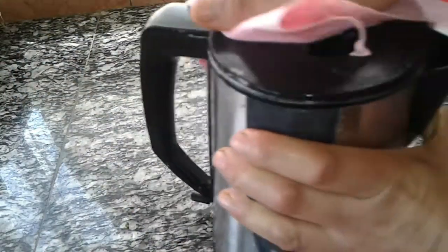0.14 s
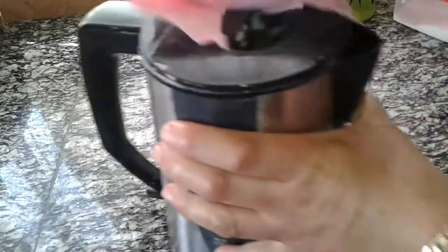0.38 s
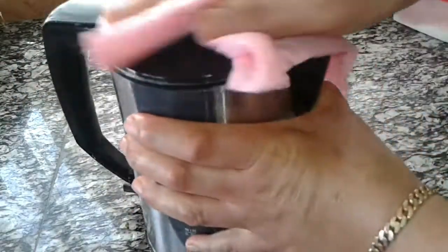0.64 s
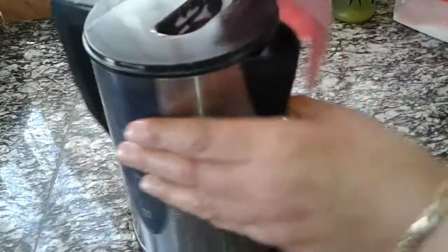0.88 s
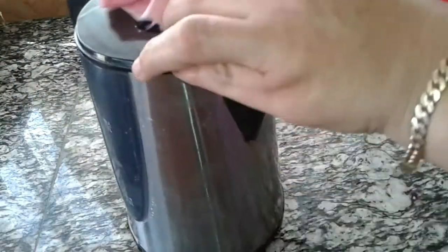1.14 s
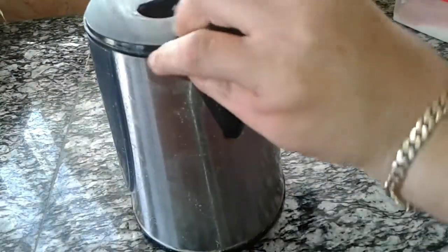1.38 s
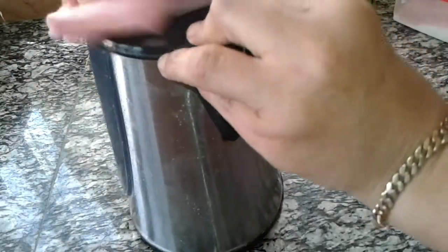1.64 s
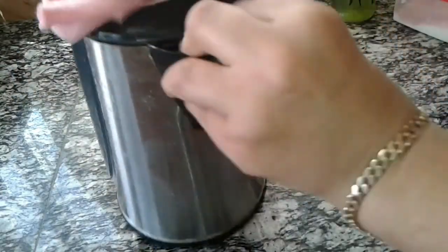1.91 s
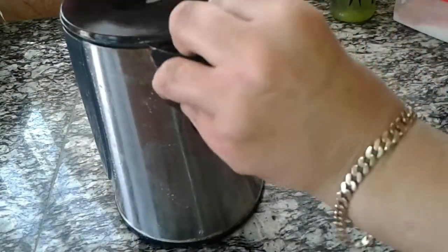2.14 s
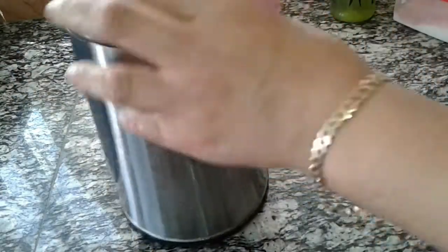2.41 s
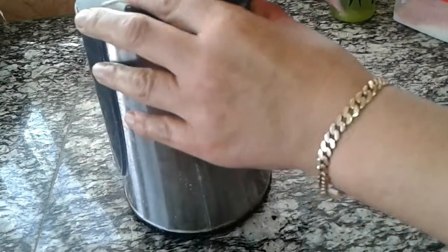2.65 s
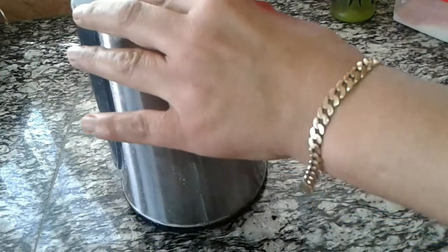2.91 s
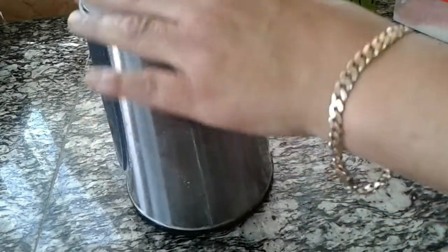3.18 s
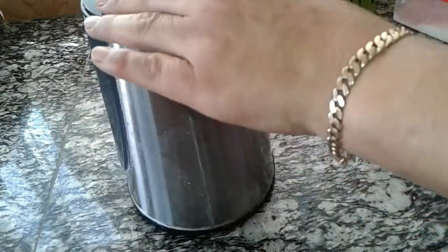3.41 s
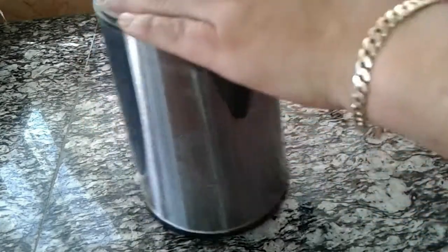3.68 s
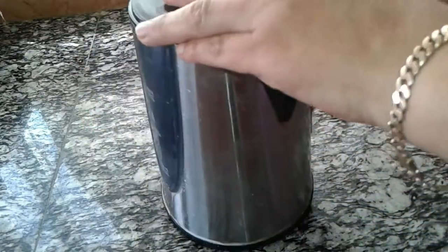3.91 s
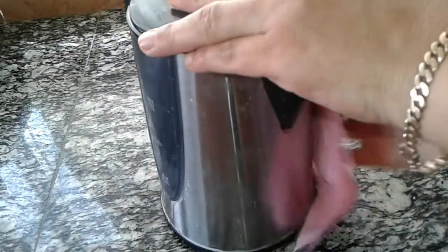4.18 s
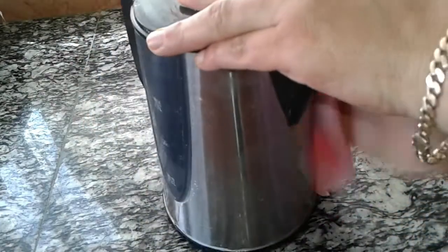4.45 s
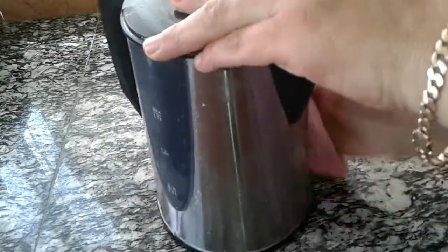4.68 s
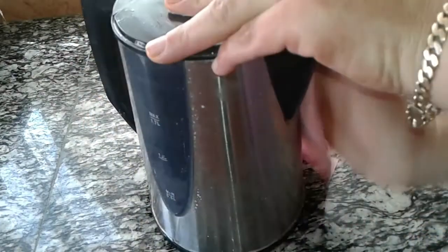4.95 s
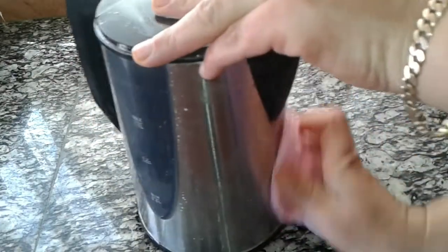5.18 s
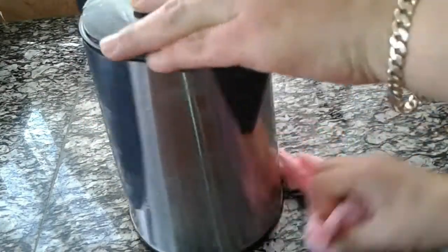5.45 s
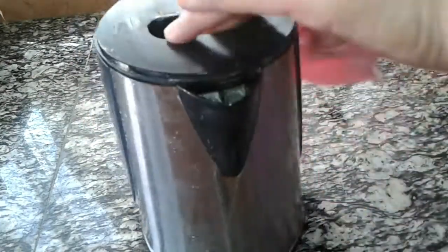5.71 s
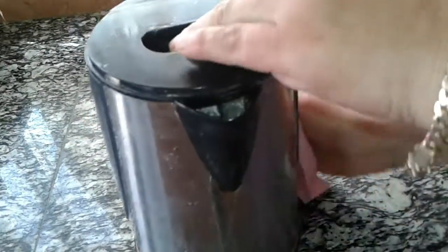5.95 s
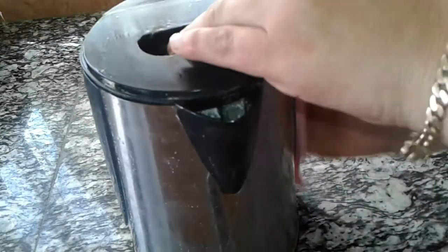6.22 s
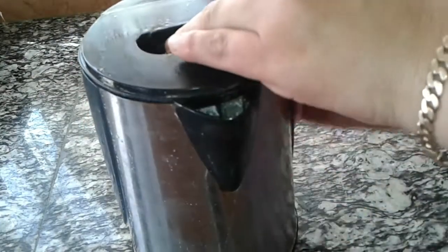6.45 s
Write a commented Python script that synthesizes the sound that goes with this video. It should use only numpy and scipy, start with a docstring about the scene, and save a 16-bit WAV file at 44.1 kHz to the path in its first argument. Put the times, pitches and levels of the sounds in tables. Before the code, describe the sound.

Close up in a quiet kitchen, a cloth wipes a steel kettle in quick, uneven strokes of airy, fibrous hiss with a slightly hollow body. The kettle shifts and knocks dully on stone, strongest in the first two and a half seconds, with crisp ticks on lid and rim and tiny thin squeaks. The middle goes soft and sparse, then steadier rubbing returns. The sound is mono with short room reflections.

```python
"""A kitchen with a stone counter: a cloth wipes a steel kettle in short strokes, close to a mono microphone.
Friction is a dense train of random fibre slips, heard as hiss and through the lid and wall.
The pushed kettle rocks and knocks on the stone: force pulses excite its damped modes.
Cloth and fingers tick on lid and rim (filtered noise bursts), the wall sings faintly (one slow mode),
and thin chirps (gliding, wobbling sines) sound over a quiet room of shaped noise."""
import sys
import numpy as np
from scipy import signal
from scipy.fft import rfft, irfft
from scipy.io import wavfile
from scipy.ndimage import uniform_filter1d

SR = 44100
rng = np.random.default_rng(int(sys.argv[2]) if len(sys.argv) > 2 else 0)


def magnitude_from_level(level_db):
    """Linear magnitude for a level in decibels (20 dB per decade)."""
    exponent = np.asarray(level_db, float) / 20
    return 10 ** exponent


def to_wav(sig):
    """Store sig (one row per channel, or 1-D mono) as 16-bit WAV at the path in sys.argv[1].

    Samples outside -1..1 are clipped; the rate is SR.
    """
    pcm = np.clip(np.atleast_2d(sig), -1, 1) * 32767
    pcm = np.round(pcm).astype(np.int16)
    wavfile.write(sys.argv[1], SR, pcm.T)  # frames by channels


N = 290470  # samples

# Quiet room: relative spectrum [f/Hz, level per Hz/dB]
ROOM_SPECTRUM = [(15, 2), (25, 2), (35, -14), (49, -3), (91, 7), (198, 3), (305, 5), (349, 0.5), (598, -5),
                 (848, -3), (1750, -14), (2600, -12.5), (4040, -12.5), (8580, -16), (15500, -17)]
# Fibres over steel: relative spectrum [f/Hz, level per Hz/dB]
HISS_SPECTRUM = [(1470, -19), (2500, -8.5), (2910, -6), (3170, -4.5), (3830, -3.5), (4430, -5),
                 (7220, -0.5), (9660, -2.5), (15500, -15)]
# Lid and wall under the rub: relative spectrum [f/Hz, level per Hz/dB]
BODY_SPECTRUM = [(290, 8), (500, 2), (874, 2), (1390, 5), (1560, 3), (1680, 3.5), (2250, 3), (5000, -12),
                 (6500, -50), (11000, -120)]
# Strokes of the cloth [t/s at full speed, length/s between the ends of the hiss arch, hiss level/dB]
STROKES = [(0.074, 0.15, -55), (0.292, 0.38, -54.5), (0.511, 0.18, -47), (0.765, 0.36, -51),
           (0.901, 0.11, -54.5), (1.073, 0.68, -63), (1.372, 0.23, -57.5), (1.453, 0.13, -57),
           (1.69, 0.17, -64.5), (1.767, 0.11, -53.5), (1.905, 0.12, -51.5), (2.034, 0.15, -56),
           (2.176, 0.12, -51.5), (2.332, 0.11, -61), (2.51, 0.44, -65), (2.65, 0.28, -60.5),
           (2.939, 0.12, -67), (3.121, 0.092, -68.5), (3.3, 0.31, -71), (3.569, 0.28, -59),
           (3.867, 0.32, -58.5), (4.009, 0.14, -51), (4.093, 0.052, -52), (4.28, 0.39, -54.5),
           (4.394, 0.075, -53), (4.531, 0.15, -53), (4.606, 0.091, -52), (4.726, 0.14, -58),
           (4.913, 0.3, -55), (4.989, 0.28, -54), (5.29, 0.23, -58), (5.444, 0.17, -59.5),
           (5.57, 0.57, -65.5), (5.838, 0.03, -63), (5.945, 0.18, -52.5), (6.179, 0.2, -56.5),
           (6.308, 0.13, -52.5), (6.464, 0.12, -54.5), (6.56, 0.075, -55.5)]
# How much the wiped part resounds, more on the lid than on the wall [t/s, level against the hiss/dB]
HOLLOWNESS = [(0, -6.5), (.3, -2.5), (.6, -9), (1.2, -3), (1.8, -8), (2.1, -2.5), (2.6, -2.5), (3.2, -3.5),
              (3.6, -9.5), (4.1, -8), (5, -11.5), (5.45, -6), (6, -9), (6.59, -9.5)]
# Modes of kettle and counter together, before excitation and stretch [f/Hz, level/dB, t60/s]
KETTLE_MODES = [(106, -38, 0.48), (129.6, -13, 0.56), (153, -23, 0.78), (190, -6, 0.42),
                (221.3, -5.5, 0.16), (270.6, -7.5, 0.063), (295.4, -5, 0.077), (315.6, 2, 0.078),
                (372, -5, 0.095), (408, 2, 0.064), (475.5, -7, 0.083), (536.4, -9, 0.12), (605, -13, 0.18),
                (696, -4.5, 0.038), (784, -14, 0.099), (1075, -17, 0.11), (1300, -53, 0.042)]
# Knocks of the base [t/s, peak level of the modes/dB, most excited f/Hz, hardness/dB per octave]
KNOCKS = [(0.052, -45.5, 258, -22), (0.103, -45.5, 200, -13), (0.287, -43, 190, -17), (0.411, -35, 253, -3),
          (0.756, -33.5, 227, -3), (0.85, -38.5, 294, 11.5), (0.914, -23.5, 231, -3),
          (1.183, -37, 202, -47), (1.366, -36.5, 149, -5), (1.413, -34, 304, -4), (1.564, -51.5, 202, -14),
          (1.653, -44.5, 204, 4), (1.73, -37, 151, -4), (1.838, -29.5, 200, 1), (1.908, -21.5, 200, 8.5),
          (1.921, -25.5, 370, 3), (2.087, -39, 363, -8), (2.11, -30, 200, -1), (2.345, -30, 204, 0),
          (2.495, -21, 217, 0.8), (2.612, -35.5, 192, 14), (2.666, -28, 304, -2), (3.074, -54, 191, -34),
          (3.256, -52, 253, -10), (3.679, -39, 202, -5), (3.77, -39.5, 314, -11), (3.853, -35.5, 327, 10),
          (3.885, -49, 170, 4), (3.908, -33, 290, 3), (4.092, -40.5, 330, 17), (4.61, -49, 342, 22),
          (4.634, -43.5, 141, -18), (4.845, -31.5, 307, -1.5), (5.255, -47, 192, -38),
          (5.464, -34.5, 205, -0.5), (5.734, -53, 199, -12), (5.864, -49.5, 199, -7), (5.999, -50, 144, 14),
          (6.212, -40, 198, -10.5)]
# Thin chirps [t/s, length/s, initial f/Hz, fall/Hz over the length, level/dB]
CHIRPS = [(.19, .09, 3700, 220, -65), (.225, .08, 3100, 80, -66), (.28, .05, 3080, 60, -72),
          (.95, .12, 3750, 150, -73), (2.21, .1, 4620, 60, -74), (2.22, .09, 4900, -80, -68),
          (2.232, .09, 3570, -30, -64), (2.265, .07, 3250, 200, -68), (2.28, .045, 2800, 400, -70),
          (2.328, .09, 2030, 40, -67), (2.385, .08, 3600, 0, -77), (2.64, .08, 4500, 100, -76),
          (2.69, .09, 3620, 0, -73), (3.115, .03, 2200, 50, -78), (4.6, .08, 4400, 50, -74),
          (5.29, .08, 3850, 50, -76)]
# Ticks on lid and rim [t/s, peak level/dB, f/Hz of the brightest ring,
# length/ms as four time constants of the main decay, broad part against the ring/dB]
TICKS = [(0.4113, -40, 1960, 10, 1), (0.6095, -37.5, 7750, 6, -10), (1.1634, -48, 4930, 2.8, -6),
         (1.1846, -43.5, 3700, 2.6, 15), (1.3397, -45.5, 1640, 3.3, -1), (1.8822, -33, 8100, 8.7, -17),
         (1.905, -29.5, 2070, 11, 5), (2.11, -41.5, 7310, 5, -8), (2.1684, -32.5, 2320, 8.1, 9),
         (2.1846, -43.5, 6770, 5.3, 16), (2.3245, -35, 2180, 22, -1), (2.6233, -39.5, 6800, 4.8, -10),
         (2.6384, -42, 4540, 6.5, 2), (2.8937, -55.5, 1980, 3.4, 5), (2.9494, -53, 5760, 8, 10),
         (3.129, -57, 2050, 5, 7), (3.855, -29.5, 6270, 12, 3), (4.117, -36.5, 9700, 7.2, 2),
         (4.1285, -46, 6900, 6.2, 15), (4.3181, -46, 2170, 6, 3), (4.3777, -46, 7800, 5.4, 16),
         (4.609, -55, 2500, 8, 14), (5.3991, -50, 1690, 3.9, 3), (5.8201, -49, 1810, 12, -2),
         (5.901, -42, 1380, 16, 6), (5.9988, -40.5, 7850, 4.9, 8), (6.3314, -40, 9000, 8.8, 13)]
# Stretches in which the wall sings [t/s, hold/s, level/dB]
SINGING = [(.95, .1, -74), (1.0, .85, -79), (1.91, .2, -78), (5.47, 1.1, -88)]

ROOM_DB = -74.5
STROKE_ENDS_DB = -12  # ends of a stroke's arch against its middle
BODY_LONGER, PUSH_LONGER = 1.124, 1.36  # arch lengths against the hiss: the body follows more loosely
PUSH_DB = -18.5  # each stroke shifts the base a little
ROCK_DB, ROCK_RISE_S, ROCK_T60_S = -19.5, 0.024, 0.36  # after a knock the base goes on rocking
FOCUS_DB, SOFT_FOCUS = 6, 0.56  # a soft landing feeds its own mode more: extra dB per dB/octave
SING_HZ, SING_T60_S = 1670, 1.6


def evened(x):
    """Normalisation by energy: scales to rms 1."""
    return x / np.sqrt(np.mean(x ** 2) + 1e-20)


def peaked(x):
    """Normalisation by amplitude: scales to peak 1."""
    return x / np.abs(x).max()


def add(mix, s, sound):
    """Superposition: adds a sound to the mix from time s."""
    part = mix[round(s * SR):][:len(sound)]
    part += sound[:len(part)]


def coloured(x, points):
    """Spectral shaping: weights x in frequency, interpolating on a log axis, to rms 1."""
    f, db = np.transpose(points)
    hz = np.fft.rfftfreq(len(x), 1 / SR)
    gain = magnitude_from_level(np.interp(np.log(hz + 1), np.log(f + 1), db))
    return evened(irfft(rfft(x) * gain, len(x)))


def flutter(ms, depth_db):
    """Random amplitude modulation: a gain of rms 1 wandering on a time scale of ms."""
    span = round(ms * SR / 1000)
    wander = uniform_filter1d(uniform_filter1d(rng.standard_normal(N), span), span)
    return evened(magnitude_from_level(depth_db * evened(wander)))


def fibres(per_s, spread_db):
    """Stick-slip as a random impulse train: dense tiny slips, most small, a few large; rms 1."""
    size = magnitude_from_level(spread_db * np.minimum(rng.exponential(1, N), 4))
    slips = rng.random(N) < per_s / SR
    return evened(size * rng.standard_normal(N) * slips)


def strokes(longer):
    """Energy addition: gain of all strokes, each a parabolic arch in decibels."""
    s, length, db = np.transpose(STROKES)[:, :, None]
    t = np.arange(0, N + 64, 64) / SR
    arch_db = db + STROKE_ENDS_DB * (2 * (t - s) / (length * longer)) ** 2
    power = magnitude_from_level(arch_db) ** 2
    return np.interp(np.arange(N) / SR, t, np.sqrt(power.sum(0)))


def dying(starts, rise_s, t60, held=0):
    """Exponential decay: gain that swells at each start, holds and dies away, powers added."""
    s, db = starts[:, :, None]
    t = np.arange(0, N + 64, 64) / SR
    age = (t - s).clip(0)
    decay = magnitude_from_level(db - 60 * (age - held).clip(0) / t60)
    power = (decay * (1 - np.exp(-age / rise_s))) ** 2
    return np.interp(np.arange(N) / SR, t, np.sqrt(power.sum(0)))


def patchy(x):
    """Time-frequency modulation: random patches of pitch and time stand out or sink back; rms 1."""
    z = signal.stft(x, nperseg=256)[2]
    field = uniform_filter1d(rng.standard_normal(z.shape), size=12, axis=0)
    field = uniform_filter1d(field, size=10, axis=1)
    return evened(signal.istft(z * magnitude_from_level(1.5 * evened(field)), nperseg=256)[1][:N])


def ring(weights, stretch, seconds):
    """Modal superposition: damped sines of the kettle, each started with its own weight."""
    hz, db, t60 = np.transpose(KETTLE_MODES)[:, :, None]
    t = np.arange(round(seconds * SR)) / SR
    decay = magnitude_from_level(db - 60 * t / (t60 * stretch))
    return (weights[:, None] * decay * np.sin(2 * np.pi * hz * t)).sum(0)


def room_tone():
    """Stationary random noise: white noise shaped to the spectrum of the quiet room."""
    return magnitude_from_level(ROOM_DB) * coloured(rng.standard_normal(N), ROOM_SPECTRUM)


def wipe():
    """Friction: fibre slips heard as hiss and through the wall; the grip varies within a stroke."""
    grip = flutter(39, 1.65) * flutter(13.0, 0.99)
    hiss = patchy(coloured(fibres(9000, 0.49), HISS_SPECTRUM)) * strokes(1)
    t, db = np.transpose(HOLLOWNESS)
    hollow = magnitude_from_level(np.interp(np.arange(N) / SR, t, db))
    body = coloured(fibres(5000, 1.3), BODY_SPECTRUM)
    body = body * flutter(27, 0.96) * hollow * strokes(BODY_LONGER)
    return grip * (hiss + body)


def drag():
    """Forced vibration: uneven small bumps of the base excite the same modes as the knocks."""
    push = magnitude_from_level(PUSH_DB) * strokes(PUSH_LONGER)
    rock = magnitude_from_level(ROCK_DB) * dying(np.transpose(KNOCKS)[:2], ROCK_RISE_S, ROCK_T60_S)
    bumps = fibres(400, 3.0) * np.hypot(push, rock)
    modes = ring(np.ones(len(KETTLE_MODES)), 1.0, .4)
    return signal.oaconvolve(bumps, modes / np.linalg.norm(modes))[:N]


def knocks():
    """Impact excitation: pulses at the base, with a dry crack; the landing decides which modes ring most."""
    out = np.zeros(N)
    mode_hz = np.transpose(KETTLE_MODES)[0]
    t = np.arange(round(.1 * SR)) / SR
    chance_db = 1.5 * rng.standard_normal((len(KNOCKS), len(KETTLE_MODES)))
    bounces = rng.random((len(KNOCKS), 2, 5))
    noise = rng.standard_normal((len(KNOCKS), len(t)))
    pulse = signal.windows.hann(round(0.00064 * SR))  # contact lasts 0.64 ms
    band = signal.butter(1, [500, 1800], "band", fs=SR, output="sos")
    crack_decay = np.exp(-t / 0.004) + 0.23 * np.exp(-t / 0.059)
    for (s, db, hz, hard_db), luck_db, (when, size), grit in zip(KNOCKS, chance_db, bounces, noise):
        focus_db = FOCUS_DB + SOFT_FOCUS * min(max(-hard_db, 0), 20)
        nearness = np.exp(-(np.log(mode_hz / hz) / 0.25) ** 2)
        weights = magnitude_from_level(focus_db * nearness + luck_db)
        weights *= magnitude_from_level(hard_db * np.log2(mode_hz / 300).clip(0))  # a hard landing lifts the upper modes
        force = np.zeros(len(t))
        force[[round(.0015 * SR), round(.004 * SR)]] = -.3, 1  # the edge touches, then the base lands
        # five smaller bounces of either sign at random times within 60 ms
        force[(when * .06 * SR).astype(int).clip(1, len(t) - 1)] = 0.33 * (2 * size - 1)
        modes = signal.fftconvolve(np.convolve(force, pulse), ring(weights, 0.94, 0.6))
        add(out, s, magnitude_from_level(db) * peaked(modes))
        crack = signal.sosfilt(band, signal.sosfilt(band, grit)) * crack_decay
        add(out, s + 0.00344, magnitude_from_level(db - 20.0 + 1.08 * hard_db) * peaked(crack))
    return out


def chirps():
    """Frequency modulation: short fuzzy whistles with a quick start and a smeared end."""
    out = np.zeros(N)
    for s, length, hz, fall_hz, db in CHIRPS:
        u = np.linspace(0, 1, round(length * SR))
        wobble = evened(uniform_filter1d(rng.standard_normal(len(u)), round(0.0041 * SR)))
        pitch = hz - fall_hz * u + 70 * wobble
        tone = np.sin(2 * np.pi * np.cumsum(pitch) / SR)
        shape = np.minimum(u / 0.015, 1) * np.exp(-1.6 * u) * np.minimum(5 - 5 * u, 1)
        add(out, s, magnitude_from_level(db) * evened(tone * shape))
    return out * flutter(5, 1.8)


def ticks():
    """Resonant filtering: a short dying burst, part broad and part through one bright, brief mode."""
    out = np.zeros(N)
    t = np.arange(round(.08 * SR)) / SR
    high = signal.butter(2, 1200, "high", fs=SR, output="sos")
    noises = rng.standard_normal((len(TICKS), len(t)))
    for (s, db, hz, ms, broad_db), noise in zip(TICKS, noises):
        rise = np.minimum(t / 0.00098, 1)
        decay = np.exp(-t * 4000 / ms) + 0.26 * np.exp(-t / 0.014)
        burst = noise * rise * decay
        rung = signal.lfilter(*signal.iirpeak(min(hz, SR / 3), 4.5, fs=SR), burst)
        broad = signal.sosfilt(high, np.convolve(burst, [.3, .4, .3], "same"))
        add(out, s, magnitude_from_level(db) * peaked(peaked(rung) + magnitude_from_level(broad_db) * peaked(broad)))
    return out


def singing():
    """Lightly damped resonance: one thin mode of the steel wall, fading slowly."""
    s, held, db = np.transpose(SINGING)
    level = dying(np.array([s, db]), .02, SING_T60_S, held[:, None])
    tone = np.sin(2 * np.pi * SING_HZ * np.arange(N) / SR)
    return np.sqrt(2) * level * flutter(220, 0.53) * tone


def kitchen(x):
    """Reverberation: sparse reflections of random sign from hard walls, dying away."""
    t = np.arange(round(.5 * SR)) / SR
    arrivals = (rng.random(len(t)) < 2000 / SR) * (t > .004)
    taps = rng.choice([-1., 1.], len(t)) * arrivals * magnitude_from_level(-60 * t / 0.42)
    return signal.oaconvolve(x, evened(taps) / np.sqrt(len(t)))[:N]  # unit energy


def scene():
    """Superposition at one microphone, in two equal channels; the small kettle radiates no deep bass."""
    thin = chirps()
    near = wipe() + knocks() + ticks() + thin
    echoes = magnitude_from_level(-8.5) * kitchen(near) + magnitude_from_level(-7) * kitchen(thin)  # the chirps get extra reflections
    sounds = near + echoes + drag() + singing()
    sounds = signal.sosfilt(signal.butter(6, 120, "high", fs=SR, output="sos"), sounds)
    return np.tile(sounds + room_tone(), (2, 1))


def band_limit(x):
    """A steep low-pass at the top of the band."""
    return signal.sosfilt(signal.butter(12, 15760, fs=SR, output="sos"), x)


def record(dry):
    """Signal chain: the finished mix goes through the last stage unaltered in balance."""
    return band_limit(dry)


dry = scene()
out = record(dry)
to_wav(out)
```